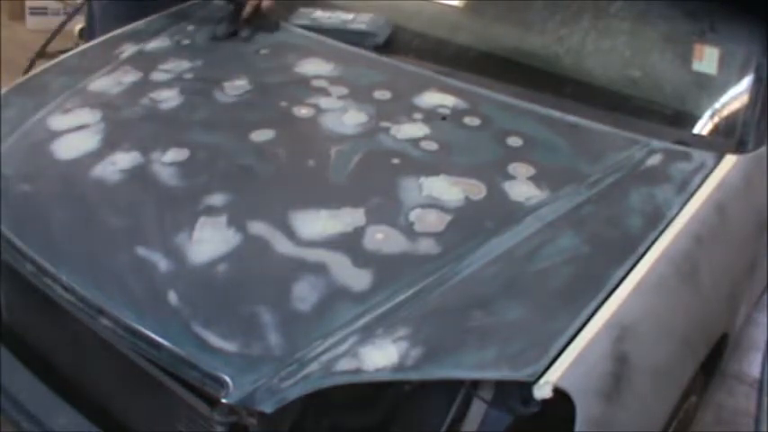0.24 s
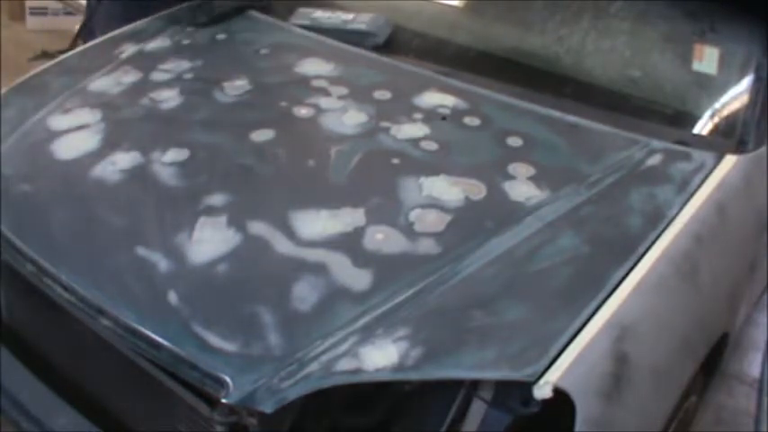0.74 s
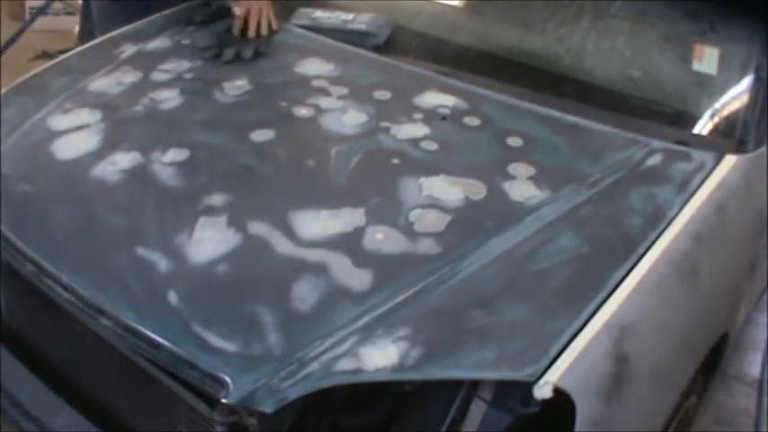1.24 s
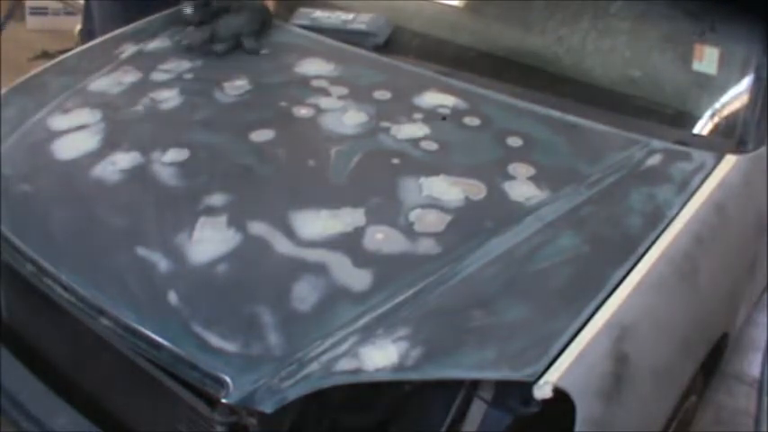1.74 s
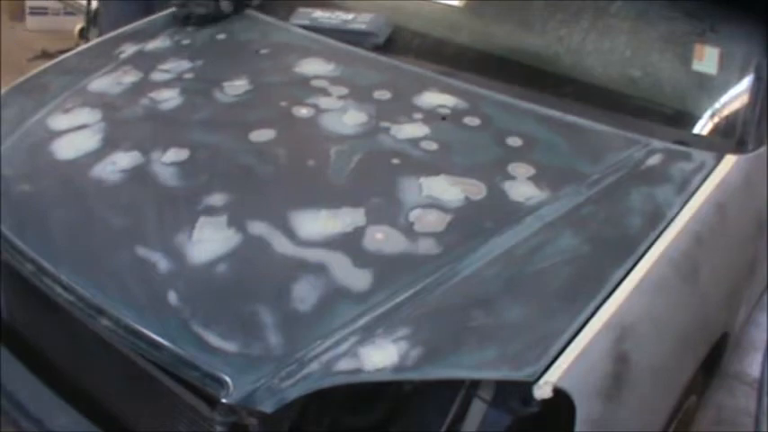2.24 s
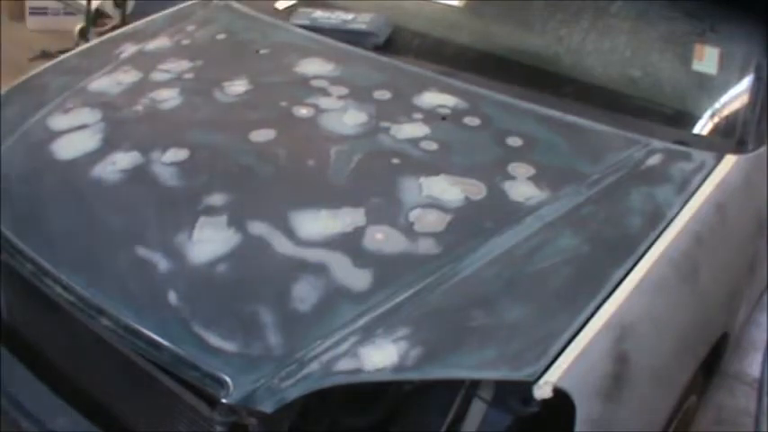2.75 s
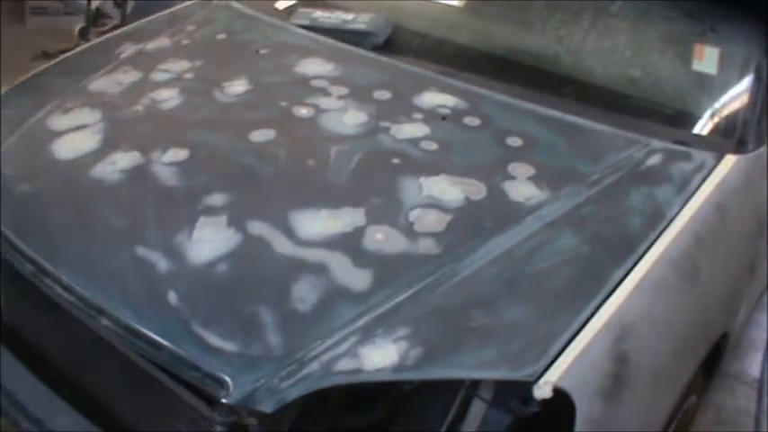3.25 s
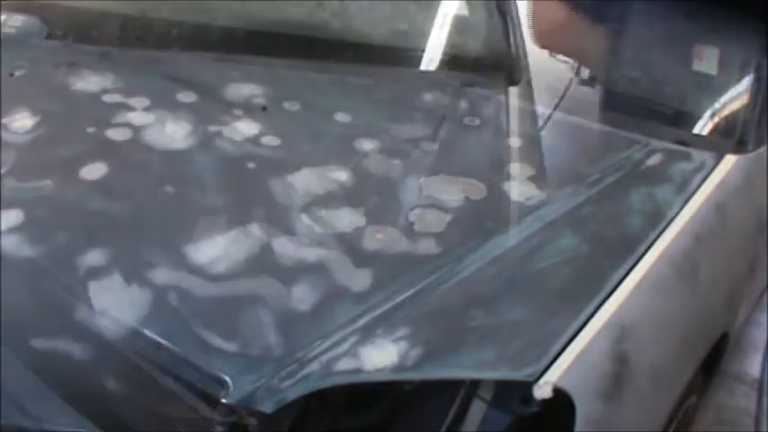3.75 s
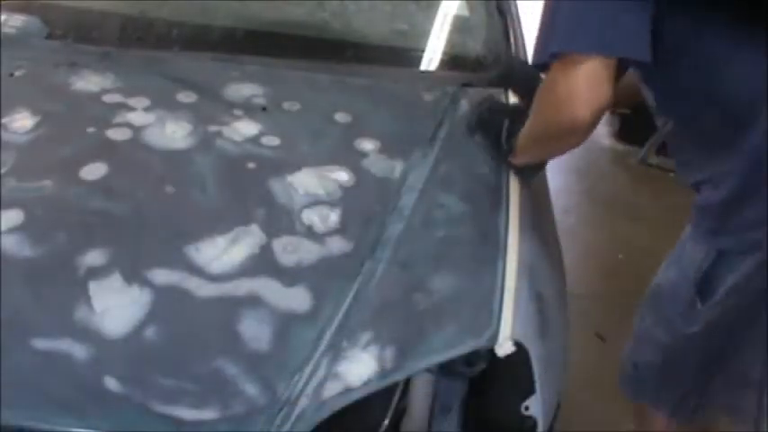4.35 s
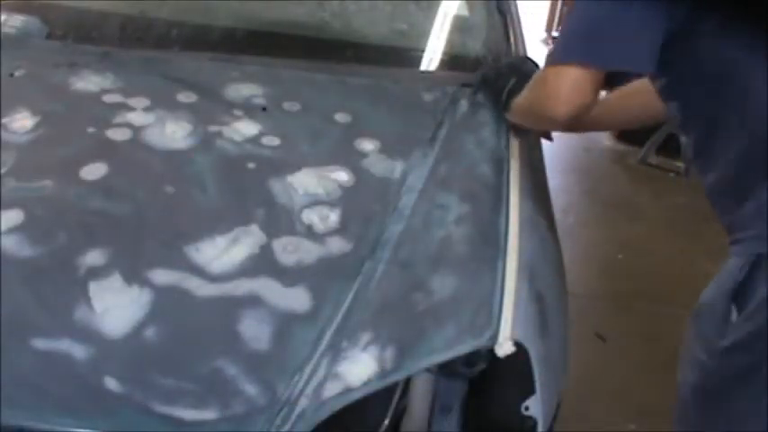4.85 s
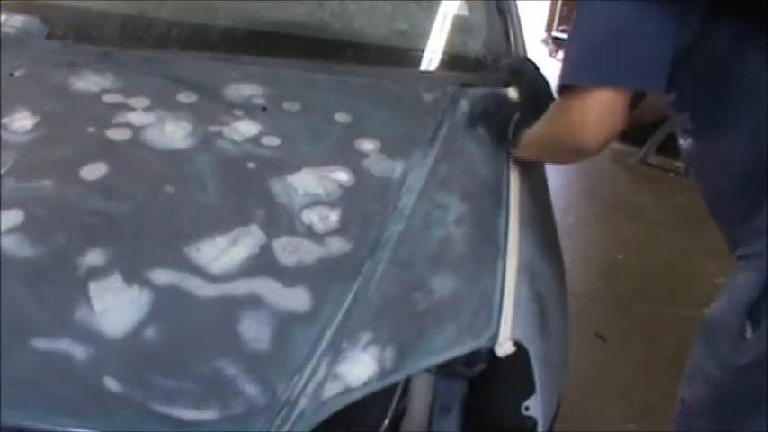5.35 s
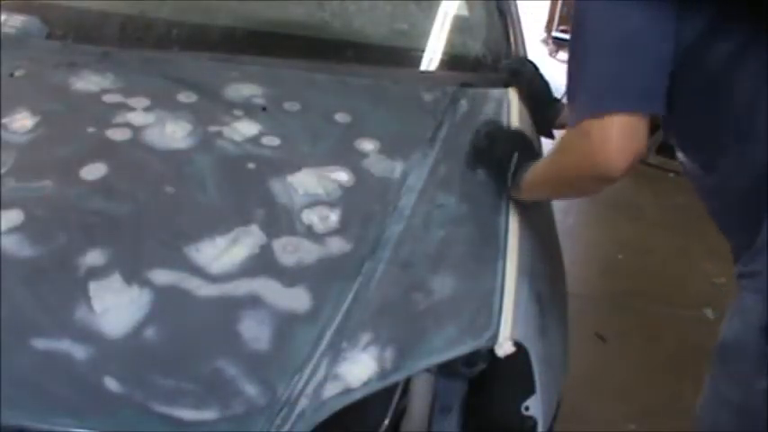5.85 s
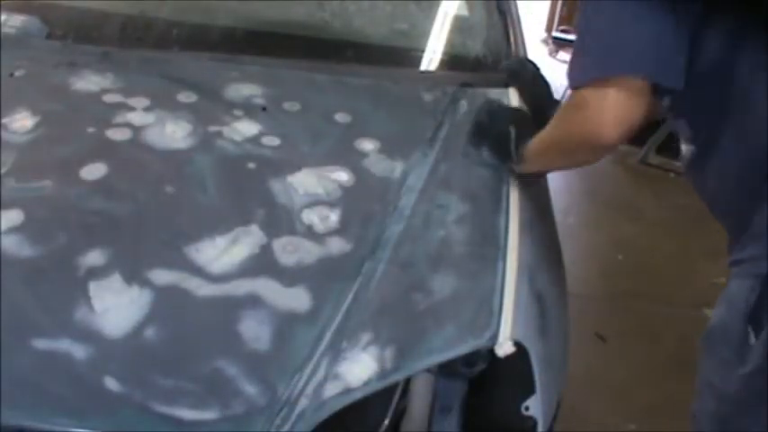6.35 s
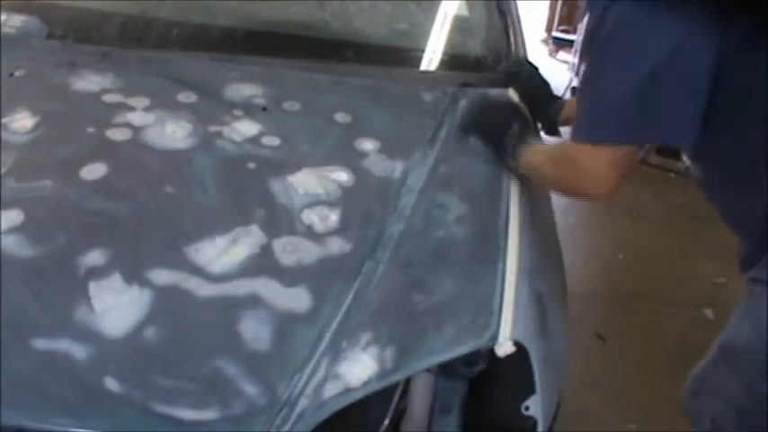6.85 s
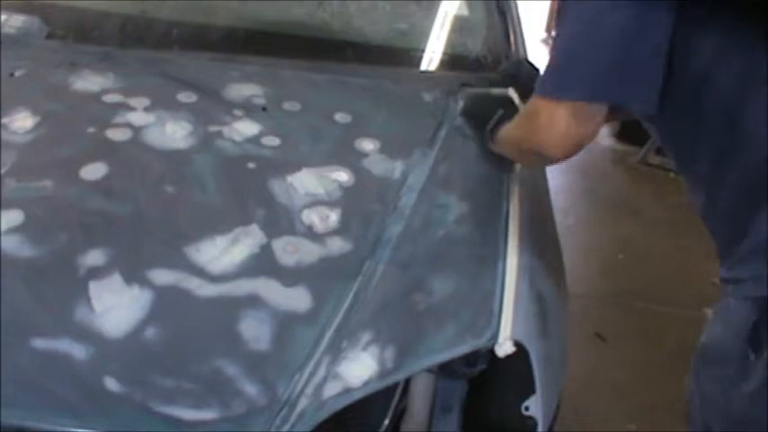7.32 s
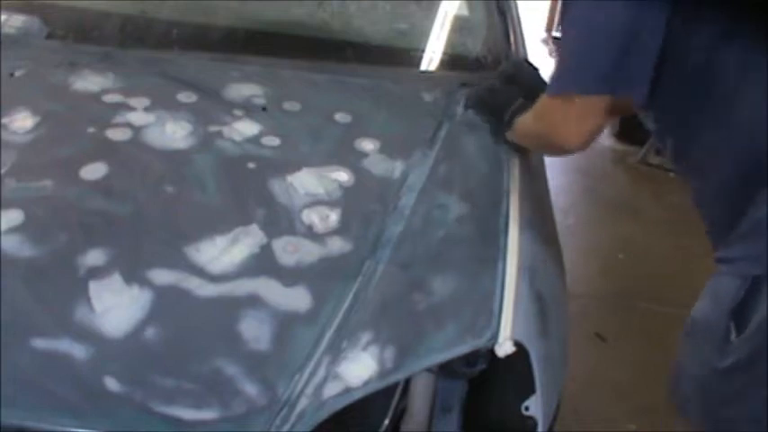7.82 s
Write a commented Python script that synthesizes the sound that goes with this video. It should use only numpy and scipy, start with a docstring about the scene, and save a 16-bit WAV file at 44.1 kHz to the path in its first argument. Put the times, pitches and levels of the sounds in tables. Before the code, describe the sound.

Air nozzle hisses over a rasping glove, a compressor swells to a whining hum and cuts out with a clunk, then fast hand-sanding scrapes.

```python
"""A body shop at work. An air nozzle hisses and a glove rasps and drums on a steel panel (shaped noise), over
the murmur and mains hum of the shop and a faint belt-driven compressor (sines and noise). At 2.1 s the heard
level of the compressor jumps, then rises steadily; near four seconds it cuts out, coasts down and vents in short
air bursts, with a clunk of ringing tank modes. Then quick hand-sanding strokes rasp in noise and ring the panel."""
import sys
import numpy as np
from scipy import signal
from scipy.fft import rfft, irfft, next_fast_len
from scipy.io import wavfile
from scipy.ndimage import uniform_filter1d, map_coordinates

SR = 44100
rng = np.random.default_rng(int(sys.argv[2]) if len(sys.argv) > 2 else 0)


def generate_wav(signal):
    """Clip the signal to [-1, 1] and save it as 16-bit WAV at the path in sys.argv[1]."""
    frames = np.transpose(np.atleast_2d(signal))
    scaled = np.clip(frames, -1, 1) * 32767
    pcm = np.round(scaled).astype(np.int16)
    wavfile.write(sys.argv[1], SR, pcm)


N = 356328
T = np.arange(N) / SR  # seconds
TOP_HZ = 15800  # upper band limit

# Colours and partial levels are relative; each layer's own level is set where it is mixed.

# Compressor motion: stroke rate, power cut, time constant of the run-down, end of the sound
PUMP_HZ, OFF_S, COAST_S, GONE_S = 135.3, 4.02, 0.58, 4.6
ROTOR_HZ, BELT_HZ, BELT_PEAK_S = 116.85, 12.45, 2.935
SLOT_HZ, TOOTH_HZ = 2141, 947.3
# the heard level of the compressor jumps here, then follows LEVEL_RISE
JUMP_S, JUMP_LEN_S = 2.09, 0.033
# level change at the power cut, and roar and fan lost as the speed falls
OFF_DROP_DB, ROAR_DB_PER_OCT, FAN_OFF_DB = -3.5, 13, -4
BASS_HZ = 604  # split between bass and treble width
# Rise of the compressor's heard level: start_s, share of the way to full
LEVEL_RISE = [(2.13, 0), (2.6, 0.3), (3, 0.53), (3.4, 0.78), (3.77, 0.99), (3.98, 1.033)]
# Heard level of each compressor layer: low_db, after_jump_db, full_db
ROAR_DB = (-45.5, -45, -23.5)
FAN_DB = (-49, -47, -29)
WHINE_DB = (-48.5, -44, -24.5)
THROB_DB = (-57.5, -52, -32)
# Pump throb overtones at stroke-rate multiples 1, 2, ..: level_db
PUMP_OVERTONES = [0.5, -10, -11.5, -13]
# Throb against stroke rate: stroke_hz, level_db
MOUNT = [(55, -40), (69, -29), (81, -21), (97, -11.5), (117, 0.5), (135, 0)]
# Slot tone sidebands, a row for each rotor multiple -2..2: below_db, on_db, above_db (by one belt rate)
ROTOR_SIDES = [(-8, -29, -38), (-1, -1.5, -7), (-8.5, 2, -16), (-14, -4.5, -20), (-25, -13, -39)]
# Tooth tone sidebands at rotor multiples -1..1: level_db
TOOTH_SIDES = [-30, -7, -9]
# Stator resonances, squared in use: centre_hz, width_hz, level_db (before squaring)
STATOR_MODES = [(2063, 60, -3), (2165, 52, -3), (2254, 32, -5)]
# Casing roar colour: freq_hz, density_db (per Hz)
CASING = [(15, -55), (25, -19), (97, -13.5), (129, -10), (168, -13), (268, -9.5), (306, -16.5),
          (399, -12.5), (969, -7.5), (1760, -9.5), (2060, -3), (2410, -9), (5000, -25), (6500, -28),
          (11000, -120)]
# Casing resonances added to the roar: centre_hz, width_hz, level_db (before halving)
CASING_MODES = [(350, 8, -10), (480, 25, -10), (735, 40, -8), (842, 12, -4), (1030, 40, -6), (1310, 16, -4),
                (1600, 50, -9), (2600, 120, -10), (3180, 60, -11), (3320, 60, -10)]
# Fan colour: freq_hz, density_db (per Hz)
FAN = [(1760, -64), (3000, -5.5), (3260, -5), (5200, -9.5), (7610, -8), (9650, -14.5), (15800, -21)]
# Stereo width by level, treble row then bass row: share of the rise where it opens, share where it is full
WIDTH_BY_LEVEL = [(-.1, 0.57), (.25, 0.93)]
# Compressor stereo: freq_hz, channel likeness (0 to 1)
FAR_ALIKE = [(60, .8), (130, .95), (240, .85), (500, .82), (950, 0.86), (1900, 0.75), (3700, 0.48),
             (7500, 0.55), (13000, 0.93)]
# Compressor lean: freq_hz, left_minus_right_db
FAR_LEAN = [(100, .7), (450, 2), (1200, 2), (2300, 4.5), (4400, 4.5), (8000, 2), (15000, 0)]
# Phase lead of the left channel, compressor, puffs and clunk: freq_hz, lead_rad
FAR_LEAD = [(110, .3), (240, 0.5), (480, 0.48), (950, 1.08), (1900, 1), (4000, 0.82), (6500, 0.25),
            (16000, 0)]

# Air nozzle: start_s, hiss_db
NOZZLE = [(0, -28), (.22, -31.5), (.46, -31.5), (.75, -33), (1.2, -30.5), (1.5, -29.5), (1.75, -31.5),
          (1.98, -29), (2.03, -20.5), (2.1, -24), (2.13, -32.5), (2.18, -51), (2.2, -59)]
# Nozzle spurts: peak_s, level_db, fall_s (per 10 dB)
SPURTS = [(.27, -26.5, .03), (.34, -22.5, 0.025), (.39, -27.5, .07), (.48, -30, .05), (.64, -27.5, 0.15),
          (1.25, -26.5, .05), (1.52, -28, .05), (1.72, -28, .02), (1.79, -26, .08), (1.96, -24.5, .02)]
# Glove wipes: start_s, end_s, start_db, end_db
WIPES = [(-.02, 0.168, -32.5, -34), (0.245, .32, -35, -39), (0.334, .63, -32, -40),
         (0.655, 0.784, -34.5, -38.5), (1.173, 1.382, -35.5, -37.5), (1.395, 1.735, -34, -36.5),
         (1.768, 1.967, -35.5, -35), (2.118, 2.12, -34, -35)]
LIFTED_DB, LAND_DB_PER_S, LIFT_DB_PER_S = -48, 500, 300  # glove barely touching, and its edges
# Glove drumming on the panel: peak_s, level_db, fall_s (per 10 dB)
DRUMS = [(.14, -49, .05), (.24, -54, .02), (.32, -41, .03), (.36, -45, .2), (.76, -39, 0.055),
         (1.11, -47, .03), (1.34, -52, .1), (1.5, -39.5, 0.08), (1.74, -47, .03), (1.92, -50, .04),
         (2.11, -45, 0.062)]
DRUM_REST_DB = -67
# Colours of jet, glove and rumble: freq_hz, density_db (per Hz)
JET = [(1760, -61), (3000, -22), (4520, -13), (6310, -6), (9510, 2.5), (15200, 5), (15800, -9)]
GLOVE = [(1200, -5), (2500, 3.5), (4500, 4), (8000, 7), (14000, -37)]
RUMBLE = [(300, -19), (700, -2.5), (1500, 2.5), (2600, -15)]
# Jet and glove stereo: freq_hz, channel likeness (0 to 1)
JET_ALIKE = [(60, 1.0), (240, 0.97), (950, 1), (3770, 0.91), (15000, 0.9)]
# Lean of everything near: freq_hz, left_minus_right_db
NEAR_LEAN = [(1000, 0), (3000, 0.7), (15000, 0.5)]
# Phase lead of the left channel, near sounds: freq_hz, lead_rad
NEAR_LEAD = [(300, 0), (900, 0.065), (1900, 0.014), (3800, 0.32), (7500, .1), (15000, .05)]

# Shop levels: start_s, murmur_db, hum_db
SHOP = [(0, -58, -69), (3, -61, -71), (3.9, -56, -58), (4.08, -46, -48), (4.3, -36, -46.5),
        (4.6, -42, -47.5), (5.5, -43, -47.5), (6.5, -44, -47.5), (7.2, -41, -48), (8.08, -42, -49)]
# Murmur colour: freq_hz, density_db (per Hz)
MURMUR = [(50, -60), (90, -21), (133, -11), (228, -10.5), (513, -12), (881, -7.5), (1400, -12), (1930, -12),
          (2890, -14), (6000, -21.5), (15800, -28)]
# Mains hum partials: pitch_hz, level_db
MAINS = [(233.6, -3), (845, -9), (907, -6.5), (959, -17), (1437, -11)]
# Bands of the faint high hiss: centre_hz, width_hz, level_db
HISS_BANDS = [(6500, 900, -15), (9900, 700, -2), (11900, 900, 2), (14700, 900, 0)]
# Shop, high hiss and sanding stereo: freq_hz, channel likeness (0 to 1)
NEAR_ALIKE = [(60, 1.0), (550, 1), (950, 1), (1900, 0.97), (3800, 0.79), (7500, 0.89), (15000, 0.94)]

# Puffs, ticks and brushes: start_s, level_db, rise_s, t60_s, centre_hz, width_octaves
PUFFS = [(2.108, -28, .0005, 0.025, 1500, 1.1), (2.457, -28.5, 0.0043, 0.16, 6480, 2.1),
         (3.975, -18.5, 0.019, 0.19, 10910, 1.4), (4.213, -14, 0.0081, 0.22, 1096, 1.05),
         (4.215, -14, 0.0043, 0.14, 2660, 0.57), (4.317, -29, .002, 0.06, 1530, 0.15),
         (4.33, -27, .002, 0.072, 1600, .15), (4, -28, 0.011, 0.19, 400, 0.43),
         (4.214, -26.5, 0.0036, 0.14, 7407, 0.64), (5.625, -34, 0.023, .2, 4630, 1.2),
         (4.509, -15.5, .0005, 0.012, 5500, 1.2)]
# Puff stereo: freq_hz, channel likeness (0 to 1)
PUFF_ALIKE = [(100, .5), (500, 0.98), (2000, 1), (7000, .78), (12000, .97)]
# Puff and clunk lean: freq_hz, left_minus_right_db
PUFF_LEAN = [(100, -1), (1000, 0), (3800, 3.5), (10000, .5)]
CLUNK_S, CLUNK_DB = 4.213, -19
CLUNK_RISE_TURNS = 8.3  # cycles a mode takes to build up
# Tank modes: pitch_hz, level_db, t60_s
TANK = [(352, -12, 0.22), (493, -6.5, 0.3), (735, -2, 0.19), (917, 0, 0.17), (1060, -6, .14),
        (1287, -3, 0.24), (1653, 1, 0.16), (1954, -2, 0.18), (2270, 0, 0.16), (2842, -1, .1),
        (3289, -2, .14)]

# Sanding strokes: start_s, rasp_db, turn_db (against the rasp), ring_db (panel)
STROKES = [(4.352, -26.5, -34, -65), (4.429, -26.5, -9.5, -46), (4.493, -26.5, -6, -55),
           (4.56, -30.5, 0, -50), (4.616, -30, -7, -63), (4.68, -30.5, 1, -47.5), (4.74, -28.5, -9, -46.5),
           (4.8, -31, 0, -44), (4.86, -30, -6, -57), (4.908, -28.5, -6, -48), (4.962, -30, -3, -56),
           (5.02, -28, -12, -47), (5.082, -28, 2, -58), (5.141, -28.5, -9, -46.5), (5.217, -28.5, -2, -59),
           (5.274, -29, -6, -47), (5.349, -29, -1, -59), (5.419, -27.5, -6, -54), (5.672, -27.5, -21, -71),
           (5.743, -29, -11, -60), (5.792, -29, -7, -57), (5.861, -29, -10, -57), (5.919, -31, -6, -52),
           (5.984, -33, -2, -47.5), (6.042, -33, -7, -63), (6.11, -35, -5, -51.5), (6.161, -34.5, -5, -67),
           (6.221, -35, -2, -52), (6.272, -35, -9, -60), (6.329, -33.5, -5, -53), (6.393, -34, -5, -56),
           (6.454, -35.5, -5, -49), (6.526, -35, -3, -69), (6.569, -36.5, 2, -62), (6.601, -34, -7, -51),
           (6.693, -33.5, 2, -63), (6.765, -31.5, -10, -52), (6.837, -29.5, -1, -68), (6.929, -26, -5, -56),
           (6.998, -27.5, -2, -52), (7.072, -28.5, -1, -51), (7.134, -28, -7, -47),
           (7.199, -29.5, 2, -40.5), (7.254, -29, -9, -49), (7.31, -30, -7, -47), (7.354, -30.5, -5, -46),
           (7.408, -30.5, -8, -42.5), (7.46, -32, -2, -42), (7.512, -32, -8, -49), (7.558, -33, -6, -42),
           (7.606, -31.5, -10, -42.5), (7.651, -32, 3, -49), (7.7, -31, -9, -48), (7.749, -32, -7, -58),
           (7.794, -31.5, -11, -61), (7.841, -30.5, -6, -48.5), (7.887, -31.5, -11, -52),
           (7.939, -31, -3, -55), (7.98, -31.5, -7, -51), (8.027, -31, -12, -62)]
STROKE_S = 0.085  # longest stroke; a wait over twice this means that the pad lifted
# Level within a stroke: share of the stroke, level_db
STROKE_SHAPE = [(.2, -1.1), (.5, 1.5), (.8, 0.1)]
# Body of the rasp against the grit: start_s, level_db
PAD_UNDER = [(4.4, -6.5), (5.5, -6.5), (6.2, -6.5), (6.8, -8), (7.3, -5.5), (8.08, -3)]
PAD_FOLLOWS, PAD_SCATTER_DB = 0.55, 0.96  # share of the grit's swings that the body follows; random spread
# Colours of grit and pad body: freq_hz, density_db (per Hz)
GRIT = [(3000, 0), (4500, -20), (5800, 0), (8000, 4), (11000, 6.5), (14000, 6), (15800, 4)]
PAD = [(1000, -22), (1400, -9.5), (1960, -8.5), (2290, -1.5), (2900, -3.5), (4280, -4), (6000, -5),
       (9000, -13)]
# Panel resonances under the pad: centre_hz, width_hz, level_db
RASP_MODES = [(2780, 55, -7), (2990, 52, -6.5), (3410, 82, -4), (3810, 41, -4), (5820, 140, -4.5),
              (7100, 170, -6.5)]
# Ringing panel modes: pitch_hz, scatter_hz, t60_s, level_db, scatter_db
PANEL = [(491.6, 8.4, 0.17, 10, 1), (374, 17, 0.13, 6, 2)]


def amp(db):
    """Decibels to linear gain."""
    return 10 ** (np.asarray(db) / 20)


def unit(x):
    """Scale to an rms of 1."""
    return x / np.sqrt(np.mean(x ** 2) + 1e-20)


def along(points, hz):
    """Read (Hz, value) points on a log frequency axis."""
    f, v = np.transpose(points)
    return np.interp(np.log(hz + 1), np.log(f + 1), v)


def curves(rows):
    """One value per sample for each column after the time."""
    s, *cols = np.transpose(rows)
    return [np.interp(T, s, c) for c in cols]


def wobble(rate):
    """A smooth random curve with rate knots a second."""
    return map_coordinates(rng.standard_normal(int(N * rate / SR) + 4), [T * rate])


def peaks(events, rest_db, rise_db_per_s):
    """Level in dB: each (peak s, dB, fall s) rises out of the rest and loses 10 dB in its fall time."""
    levels = [rest_db + 0 * T]
    for s, db, fall in events:
        levels.append(db - np.where(T < s, rise_db_per_s * (s - T), 10 * (T - s) / fall))
    return np.max(levels, axis=0)


def filtered(x, response):
    """Shape x by a complex response of frequency."""
    m = next_fast_len(N + 8192)
    return irfft(rfft(x, m) * response(np.fft.rfftfreq(m, 1 / SR)), m)[..., :N]


def modes(table, f):
    """Magnitude of a set of resonances, summed in power."""
    return np.sqrt(sum(np.abs(amp(db) * f * w / (c * c - f * f + 1j * f * w)) ** 2 for c, w, db in table))


def placed(x, lean, lead):
    """Level and phase differences between left and right, shared half and half."""
    halves = np.array([[0.5], [-0.5]])
    return filtered(x, lambda hz: (amp(along(lean, hz)) * np.exp(1j * along(lead, hz))) ** halves)


def rush(colour, alike, patchy_db=0):
    """Stereo noise of rms 1 with patches of random gain; colour is a gain of frequency or a (Hz, dB) table."""
    if callable(colour):
        gain = colour
    else:
        points = [(colour[0][0] / 2, -120)] + list(colour)
        gain = lambda hz: amp(along(points, hz))
    pair = rng.standard_normal((2, N))
    if patchy_db:
        z = signal.stft(pair, nperseg=512)[2]
        field = uniform_filter1d(rng.standard_normal(z.shape[1:]), size=2, axis=0)
        field = uniform_filter1d(field, size=3, axis=1)
        pair = signal.istft(z * amp(patchy_db * unit(field)), nperseg=512)[1][:, :N]
    # the less alike the channels, the more side signal
    turn = lambda hz: np.arccos(np.clip(along(alike, hz), -1, 1)) / 2
    mid, side = filtered(pair, lambda hz: gain(hz) * [np.cos(turn(hz)), np.sin(turn(hz))])
    return unit(np.array([mid + side, mid - side]))


def pump_throb(pump_hz, slack):
    """Stroke-rate overtones, which weaken as the strokes slow."""
    crank = 2 * np.pi * np.cumsum(pump_hz) / SR
    throb = 0
    for k, db in enumerate(PUMP_OVERTONES, 1):
        gain = amp(db + 0.5 * k ** 0.5 * wobble(8.7)) * slack ** (1.6 * (k - 1))
        throb = throb + gain * np.sin(k * crank)
    return unit(throb)


def magnetic_whine(rotor, belt, shake):
    """Slot tone pulsed by the rotor field and peaking once a belt turn, a tooth tone and stator noise."""
    sides = 0
    for k, row in enumerate(ROTOR_SIDES, -2):
        for m, db in enumerate(row, -1):
            sides = sides + amp(db) * np.exp(1j * (k * rotor + m * belt))
    slot = np.real(sides * np.exp(2j * np.pi * SLOT_HZ * T + 0.15j * wobble(12)))
    tooth = sum(amp(db + wobble(22)) * np.sin(2 * np.pi * TOOTH_HZ * T + k * rotor)
                for k, db in enumerate(TOOTH_SIDES, -1))
    stator = rush(lambda hz: modes(STATOR_MODES, hz) ** 2, FAR_ALIKE)
    stator = amp(-5.5) * shake * (1 + 0.25 * np.cos(belt)) * stator
    return amp(1.1 * wobble(30.07)) * unit(slot + tooth) + stator


def compressor():
    """Pump throb, magnetic whine, ringing casing and fan, leaning left; only the pump's pitch runs down."""
    rise, = curves(LEVEL_RISE)
    jump = np.clip((T - JUMP_S) / JUMP_LEN_S, 0, 1)
    level = lambda low, up, full: low + (up - low) * jump + (full - up) * rise
    slack = np.exp(-np.clip(T - OFF_S, 0, None) / COAST_S)  # relative speed
    pump_hz = PUMP_HZ * slack * (1 + 0.00199 * wobble(1.5))
    alive = np.clip((GONE_S - T) / 0.078, 0, 1)
    powered = np.clip((OFF_S + 0.021 - T) / 0.058, 0, 1)
    fade_db = OFF_DROP_DB * (1 - powered) + ROAR_DB_PER_OCT * np.log2(slack)
    rotor = 2 * np.pi * ROTOR_HZ * T
    belt = 2 * np.pi * BELT_HZ * (T - BELT_PEAK_S)
    shake = 1 + powered * (0.052 * np.cos(rotor) + 0.11 * np.cos(belt))

    throb = amp(level(*THROB_DB) + along(MOUNT, pump_hz)) * pump_throb(pump_hz, slack)
    whine = amp(level(*WHINE_DB)) * powered * magnetic_whine(rotor, belt, shake)
    roar = rush(lambda hz: amp(along(CASING, hz) - 6.5) + 0.5 * modes(CASING_MODES, hz), FAR_ALIKE)
    roar = amp(level(*ROAR_DB) + 0.6 * wobble(20.92)) * roar
    fan = amp(level(*FAN_DB) + FAN_OFF_DB * (1 - powered)) * rush(FAN, FAR_ALIKE, patchy_db=2.5)
    machine = throb + whine + shake * amp(fade_db) * (roar + fan)
    left, right = placed(alive * machine, FAR_LEAN, FAR_LEAD)

    # stereo width set by level: the treble opens before the bass, and both close at the end
    closing = np.clip((GONE_S - 0.2 - T) / 0.15, 0, 1)
    high, low = (jump * np.clip((rise - a) / (b - a), 0, 1) * closing for a, b in WIDTH_BY_LEVEL)
    difference = left - right
    bass = filtered(difference, lambda hz: 1 / (1 + (hz / BASS_HZ) ** 4))
    side = (low * bass + high * (difference - bass)) / 2
    return (left + right) / 2 + side * [[1], [-1]]


def clearing():
    """Air jet, a glove dragged over the paint and the panel's rumble under it, all as shaped noise."""
    jet_db = peaks(SPURTS, curves(NOZZLE)[0], rise_db_per_s=304)
    rumble_db = peaks(DRUMS, DRUM_REST_DB, rise_db_per_s=280)
    wipe_levels = [LIFTED_DB + 0 * T]
    for a, b, db, end_db in WIPES:
        landing = LAND_DB_PER_S * np.clip(a - T, 0, None)
        lifting = LIFT_DB_PER_S * np.clip(T - b, 0, None)
        wipe_levels.append(np.interp(T, [a, b], [db, end_db]) - landing - lifting)
    glove_db = np.max(wipe_levels, axis=0)
    alive = np.clip((NOZZLE[-1][0] - T) / 0.058, 0, 1)
    drag = 1.65 * wobble(25.12)  # dB, shared by glove and rumble
    jet = amp(jet_db + 1.3 * wobble(30.2)) * rush(JET, JET_ALIKE, patchy_db=2.5)
    glove = amp(glove_db + drag) * rush(GLOVE, JET_ALIKE, patchy_db=4.0)
    rumble = amp(rumble_db + drag) * rush(RUMBLE, JET_ALIKE)
    return alive * (jet + glove + rumble)


def shop():
    """Distant murmur, lumpy deep bass, a faint high hiss in bands and the wavering mains hum of idle machines."""
    murmur_db, hum_db = curves(SHOP)
    hum = 0
    for hz, db in MAINS:
        gain = amp(db + hz / 600 * wobble(14)) * np.sqrt(2)
        hum = hum + gain * np.sin(2 * np.pi * hz * T + hz / 1500 * wobble(12))
    deep_colour = [(25, -6), (45, -6), (80, -1), (110, -40), (200, -120)]
    deep_bass = amp(-78 + 9 * wobble(7)) * rush(deep_colour, [(50, 1)])
    hiss_db = np.interp(T, [3.4, 4.4], [-50, -60])  # fades between 3.4 and 4.4 s
    high_hiss = amp(hiss_db) * rush(lambda hz: modes(HISS_BANDS, hz), NEAR_ALIKE)
    murmur = amp(murmur_db) * rush(MURMUR, NEAR_ALIKE, patchy_db=2.5)
    return murmur + amp(hum_db) * hum + deep_bass + high_hiss


def puffs():
    """Short decaying noise bands: air from the valves, ticks on metal and a brush of the pad."""
    out = np.zeros((2, N))
    for s, db, rise, t60, hz, octaves in PUFFS:
        t = np.clip(T - s, 0, None)
        band = rush(lambda f: np.exp(-0.5 * (np.log2((f + 1) / hz) / octaves) ** 2), PUFF_ALIKE)
        out += amp(db - 60 * t / t60) * np.clip(t / rise, 0, 1) * band
    return out


def clunk():
    """The tank's modes ring after the valve slams, the low ones building up more slowly."""
    t = np.clip(T - CLUNK_S, 0, None)
    ring = 0
    for hz, db, t60 in TANK:
        build_up = 1 - np.exp(-(t * hz / CLUNK_RISE_TURNS) ** 2)
        tone = np.sin(2 * np.pi * (hz * t + rng.random()))
        ring = ring + amp(db - 60 * t / t60) * build_up * tone
    return amp(CLUNK_DB + 2 * wobble(120)) * ring


def sanding():
    """Grit and pad noise rise within each stroke, change level at the turn and fall away when the pad lifts."""
    starts = [row[0] for row in STROKES]
    under = np.interp(starts, *np.transpose(PAD_UNDER))
    under = under + PAD_SCATTER_DB * rng.standard_normal(len(starts))
    knots = [(starts[0] - 0.012, -80, -80)]  # time s, grit dB, body dB
    for (s, db, turn_db, _), under_db, after in zip(STROKES, under, starts[1:] + [N / SR]):
        length = min(after - s, STROKE_S)
        for u, d in [(0, turn_db)] + list(STROKE_SHAPE):
            knots.append((s + u * length, db + d, db + under_db + PAD_FOLLOWS * d))
        if after - s > 2 * STROKE_S:
            # lifted, then easing back on
            knots += [(s + 1.53 * length, -62, -62), (after - 0.04, -58, -60), (after - 0.02, -46, -52)]
    grit_db, body_db = curves(knots)
    grain = 0.82 * wobble(90)
    grit = amp(grit_db + grain) * rush(GRIT, NEAR_ALIKE, patchy_db=2.5)
    body = amp(body_db + grain) * rush(PAD, NEAR_ALIKE, patchy_db=2.5)
    return filtered(grit + body, lambda hz: 1 + modes(RASP_MODES, hz))


def panel():
    """Each push of the pad softly rings two decaying panel modes, slightly detuned at random."""
    out = np.zeros(N + SR)
    t = np.arange(SR // 4) / SR
    chances = rng.standard_normal((len(STROKES), 2, 2))
    for (s, _, _, ring_db), pairs in zip(STROKES, chances):
        for (hz, scatter_hz, t60, db, scatter_db), (detune, louder) in zip(PANEL, pairs):
            decay = amp(ring_db + db + scatter_db * louder - 60 * t / t60)
            onset = 1 - np.exp(-t / 0.0069)
            ring = decay * onset * np.sin(2 * np.pi * (hz + scatter_hz * detune) * t)
            out[round(s * SR):][:len(t)] += ring
    return out[:N] * amp(2.3 * wobble(60))


def scene():
    """Mix the compressor, the near work and shop, and the puffs and clunk in stereo."""
    near = placed(clearing() + shop() + sanding() + panel(), NEAR_LEAN, NEAR_LEAD)
    bursts = placed(puffs() + clunk(), PUFF_LEAN, FAR_LEAD)
    return compressor() + near + bursts


def record(dry):
    """Cut everything at and above the band limit."""
    return filtered(dry, lambda hz: hz < TOP_HZ)


dry = scene()
out = record(dry)
generate_wav(out)
```